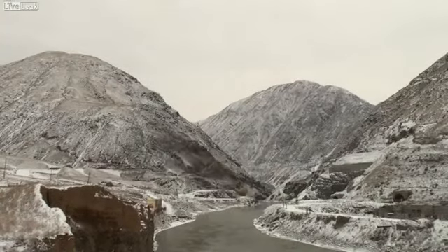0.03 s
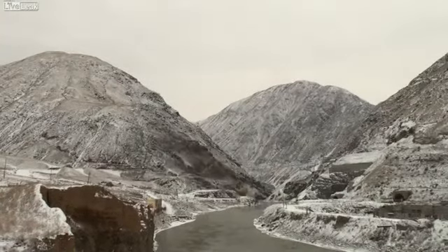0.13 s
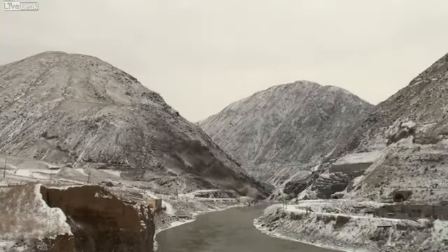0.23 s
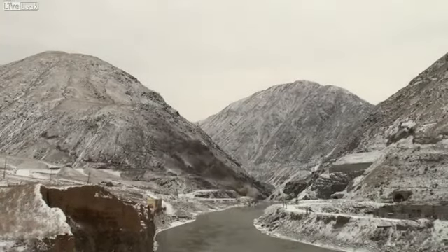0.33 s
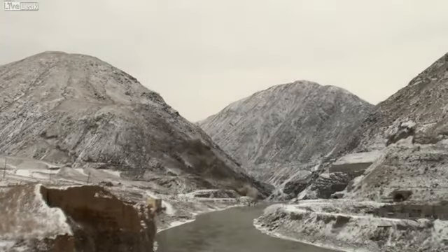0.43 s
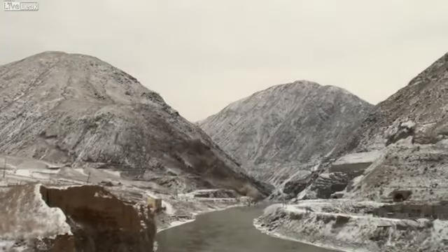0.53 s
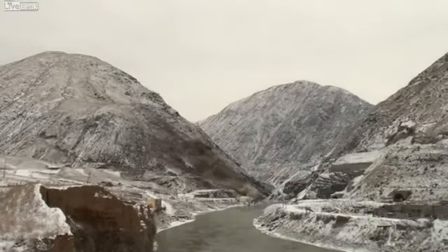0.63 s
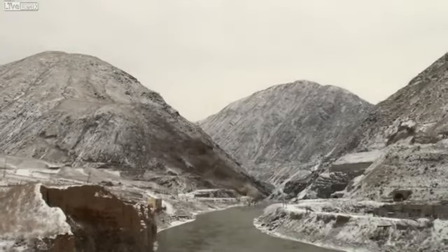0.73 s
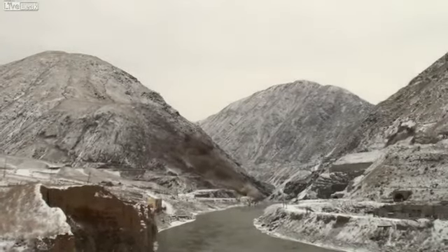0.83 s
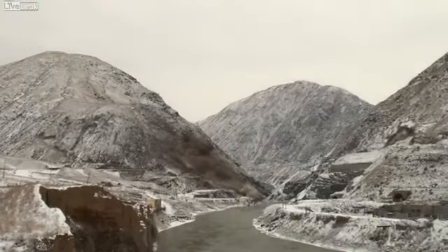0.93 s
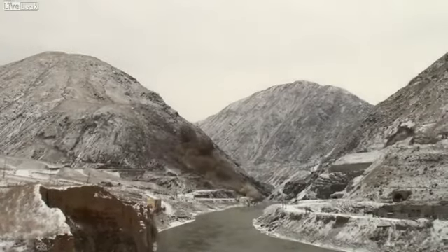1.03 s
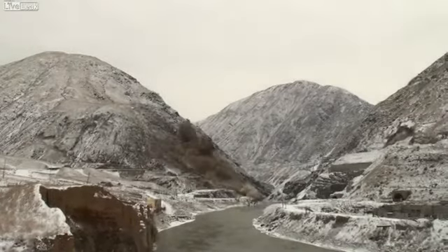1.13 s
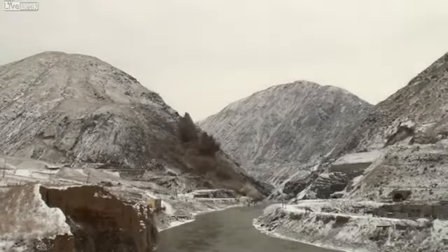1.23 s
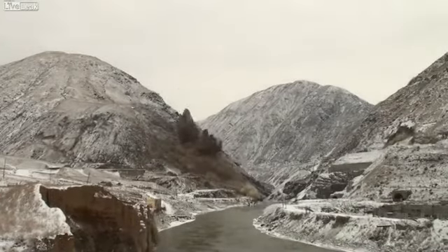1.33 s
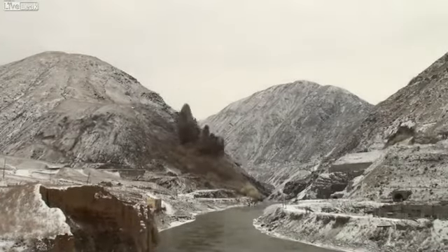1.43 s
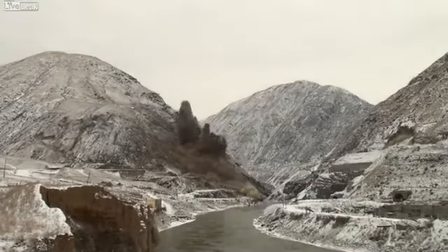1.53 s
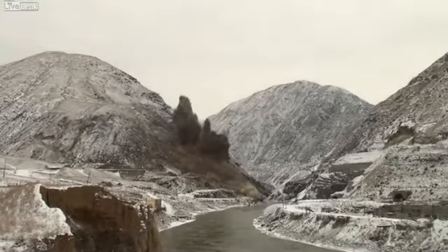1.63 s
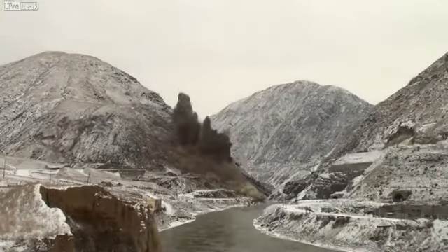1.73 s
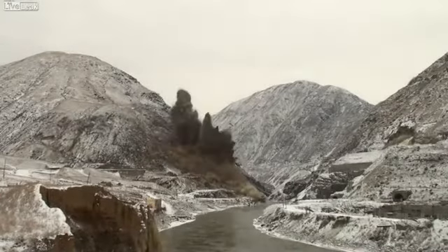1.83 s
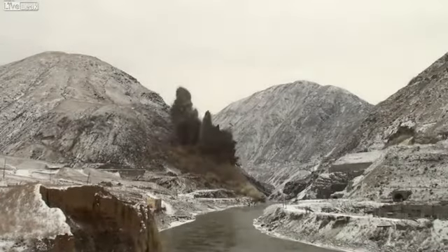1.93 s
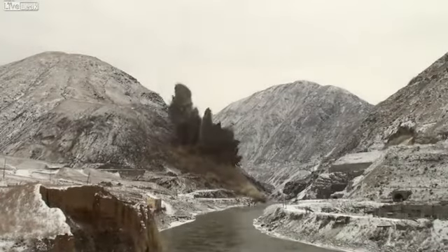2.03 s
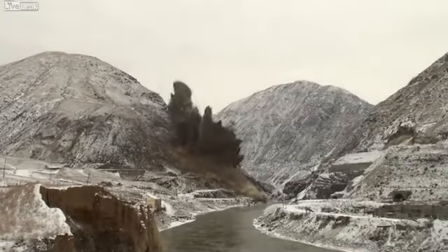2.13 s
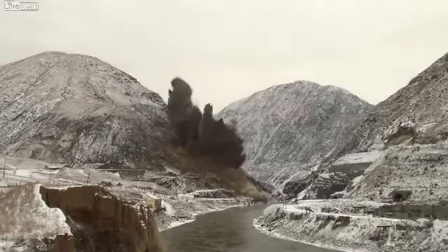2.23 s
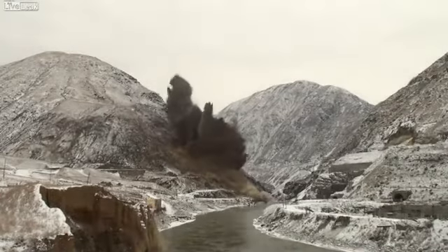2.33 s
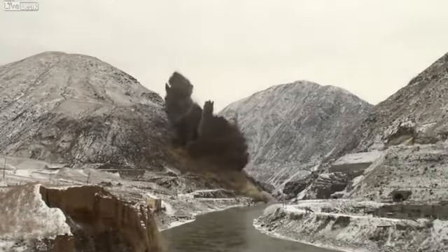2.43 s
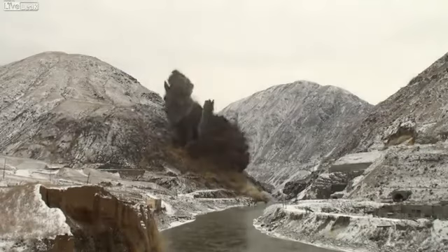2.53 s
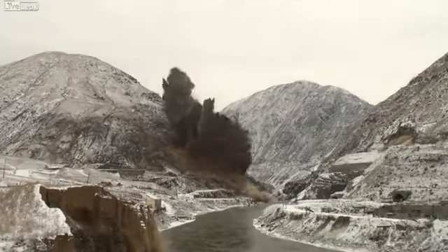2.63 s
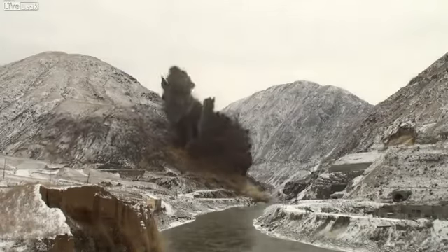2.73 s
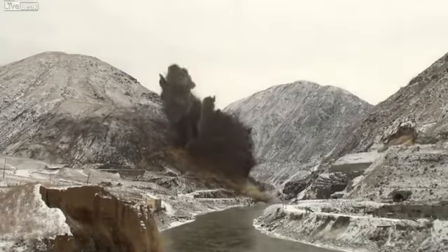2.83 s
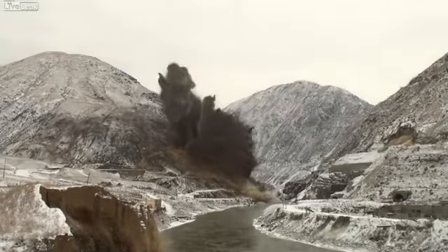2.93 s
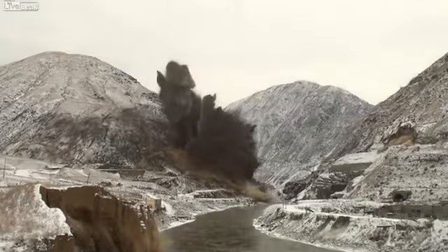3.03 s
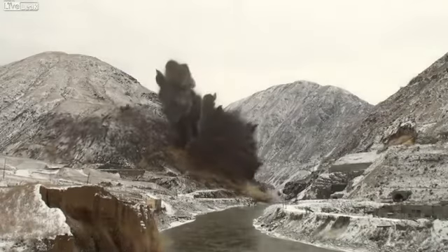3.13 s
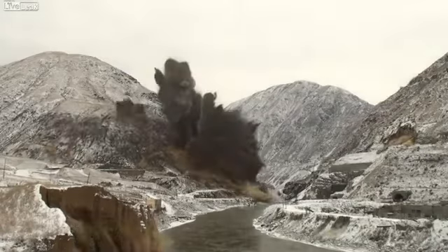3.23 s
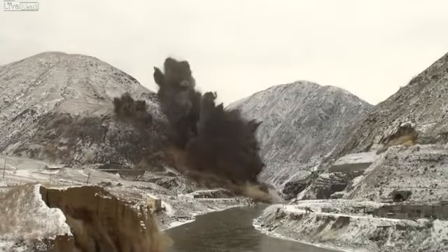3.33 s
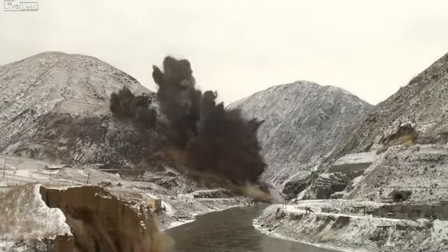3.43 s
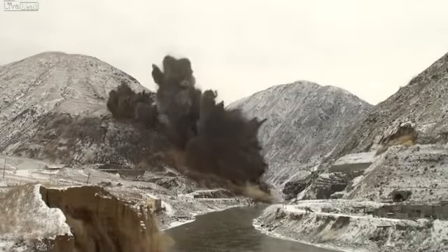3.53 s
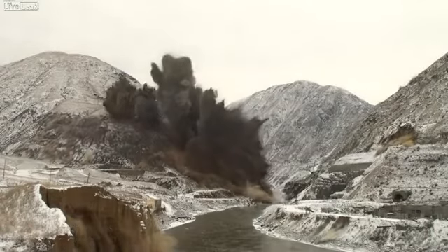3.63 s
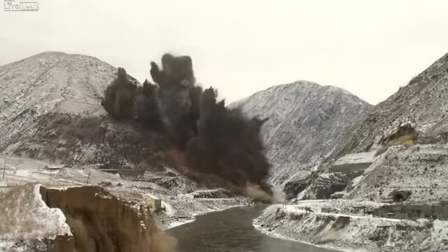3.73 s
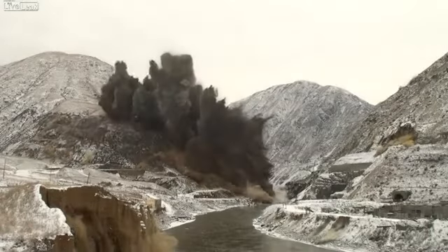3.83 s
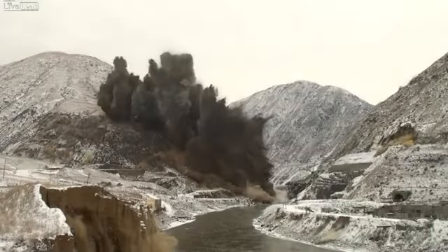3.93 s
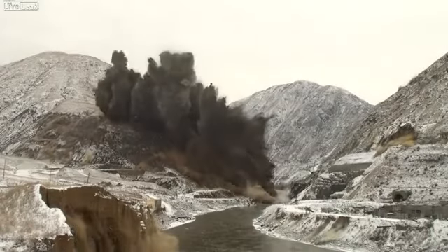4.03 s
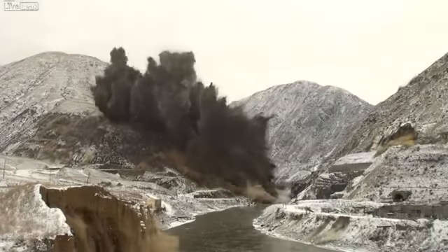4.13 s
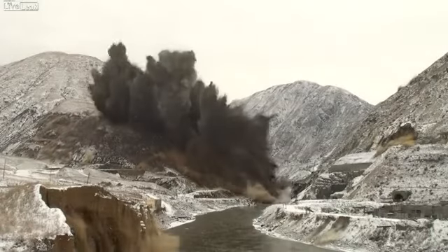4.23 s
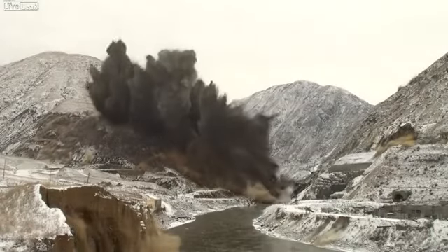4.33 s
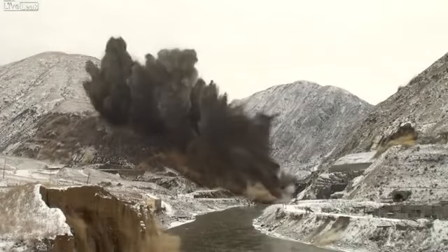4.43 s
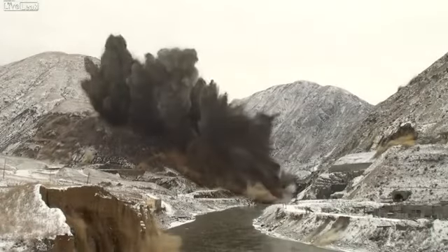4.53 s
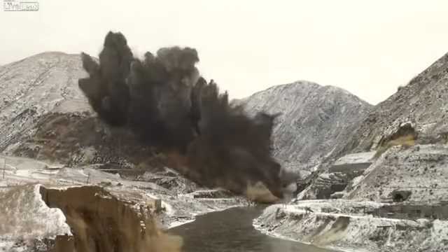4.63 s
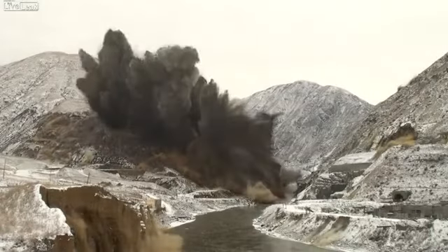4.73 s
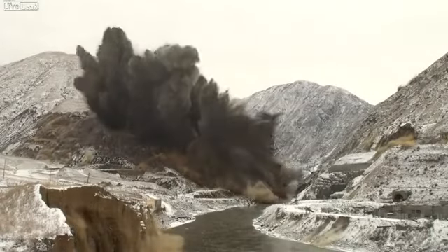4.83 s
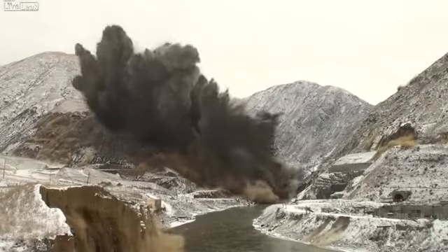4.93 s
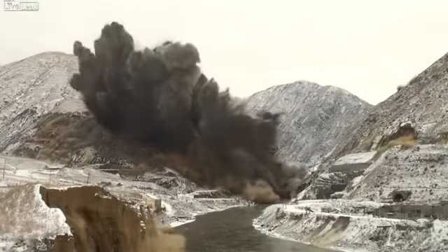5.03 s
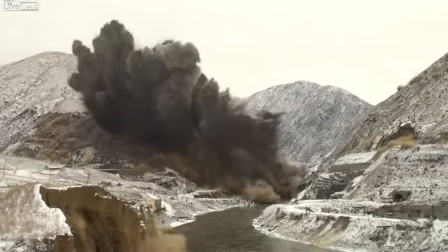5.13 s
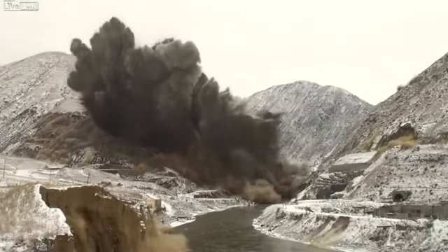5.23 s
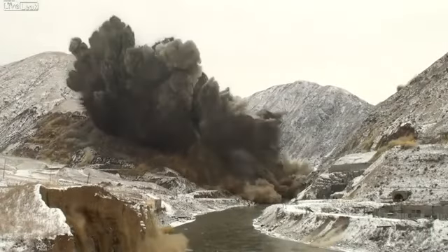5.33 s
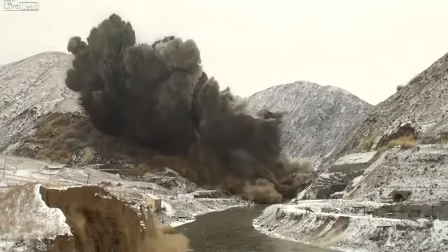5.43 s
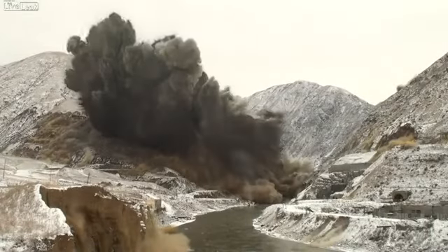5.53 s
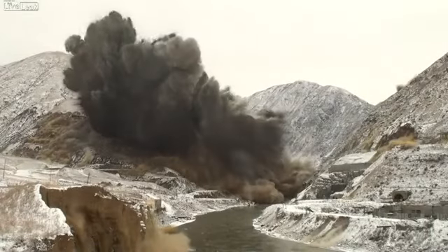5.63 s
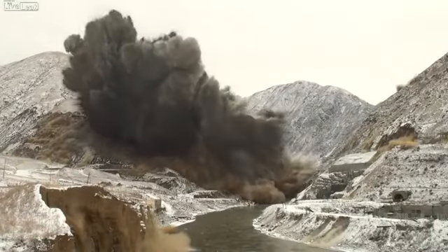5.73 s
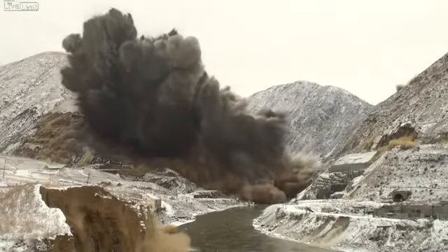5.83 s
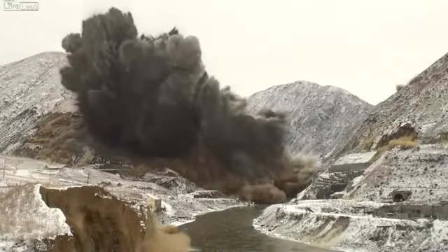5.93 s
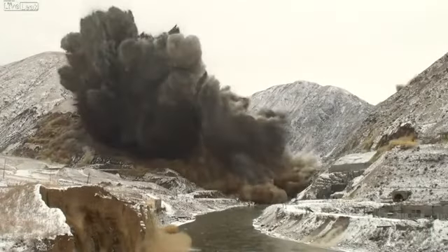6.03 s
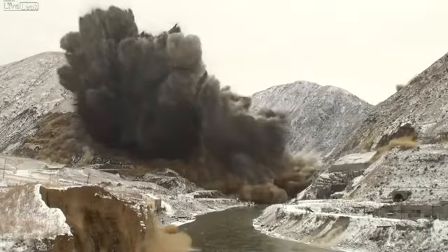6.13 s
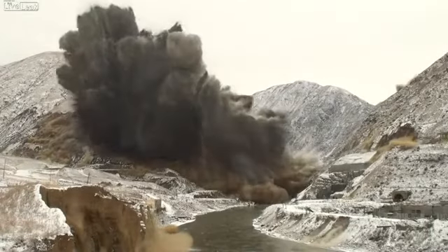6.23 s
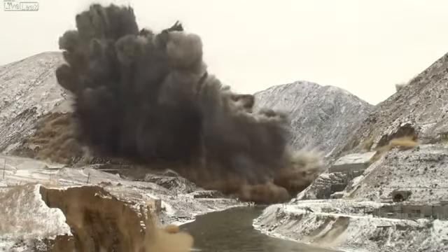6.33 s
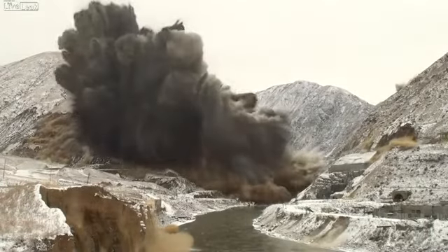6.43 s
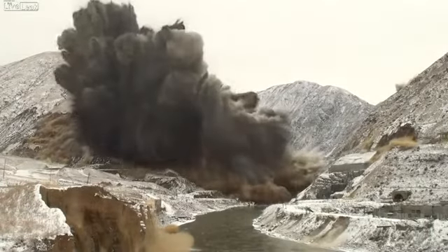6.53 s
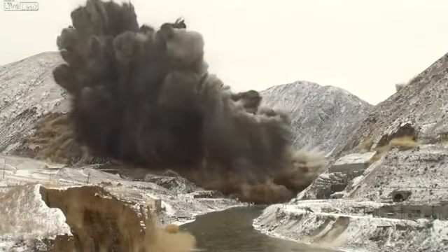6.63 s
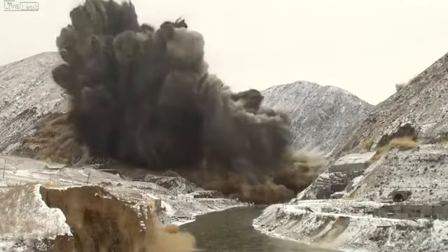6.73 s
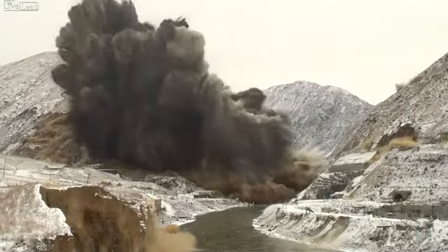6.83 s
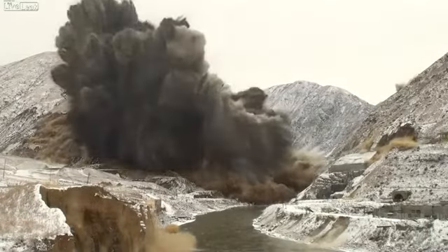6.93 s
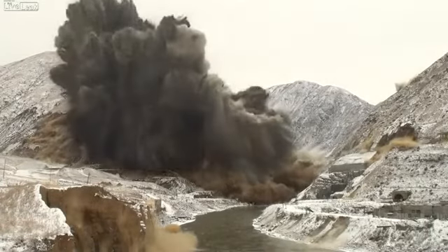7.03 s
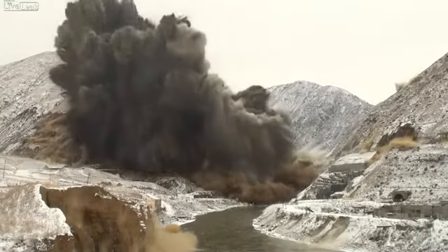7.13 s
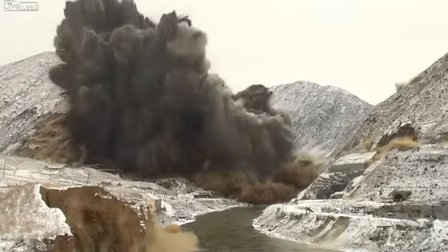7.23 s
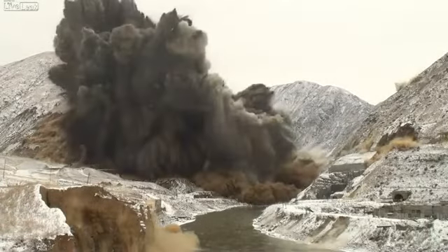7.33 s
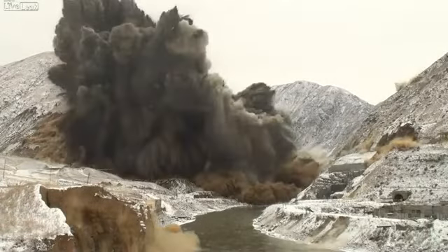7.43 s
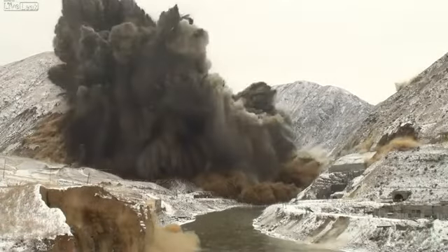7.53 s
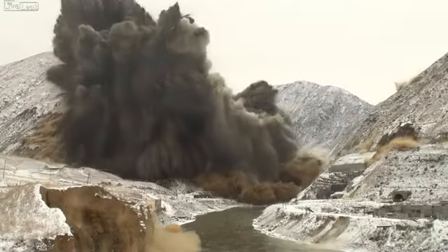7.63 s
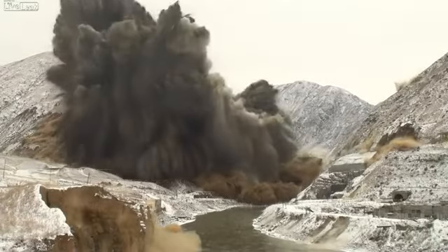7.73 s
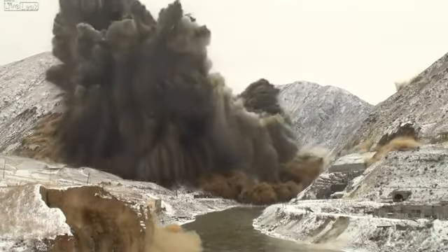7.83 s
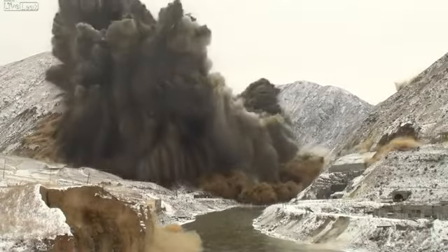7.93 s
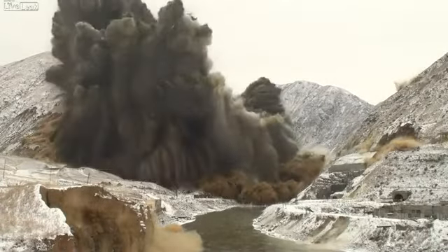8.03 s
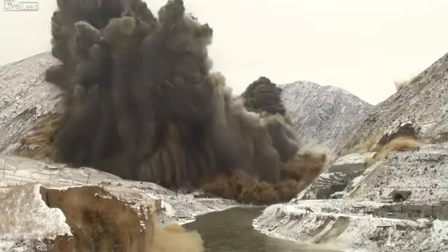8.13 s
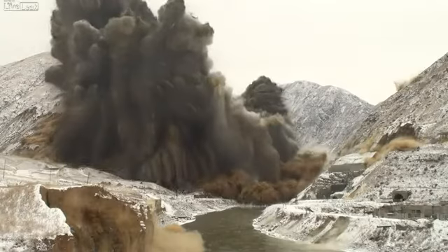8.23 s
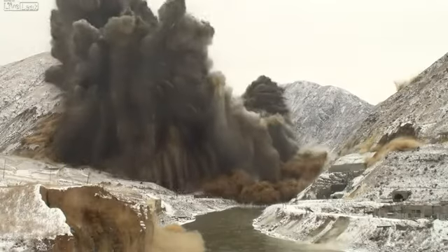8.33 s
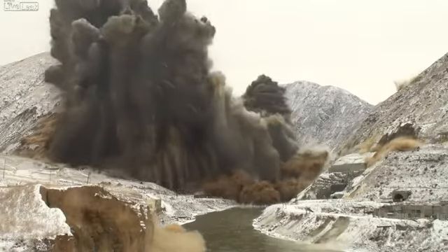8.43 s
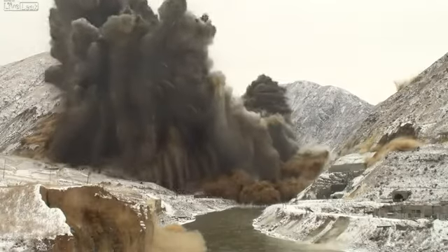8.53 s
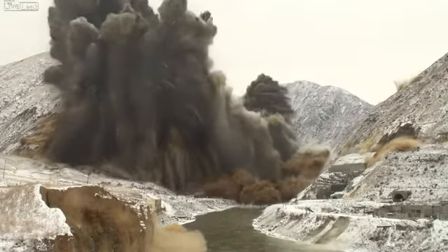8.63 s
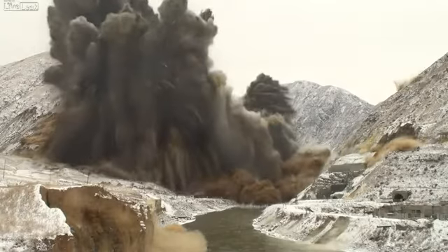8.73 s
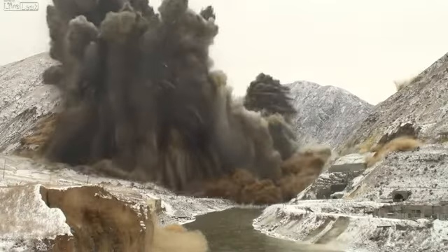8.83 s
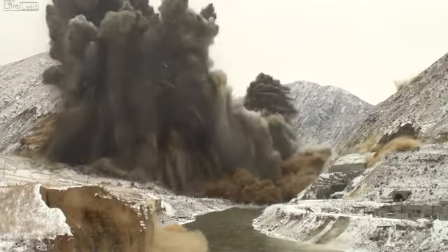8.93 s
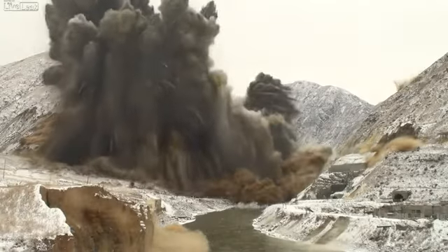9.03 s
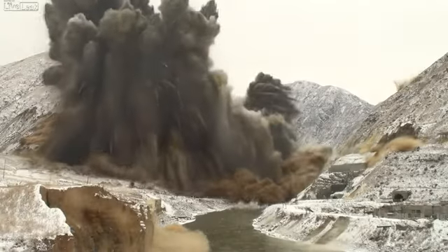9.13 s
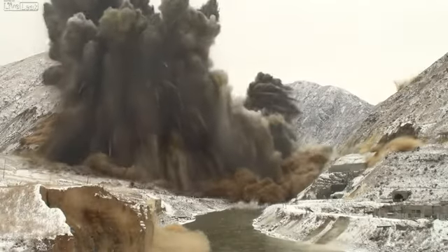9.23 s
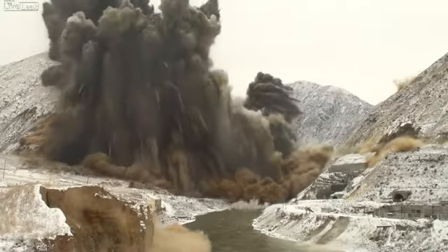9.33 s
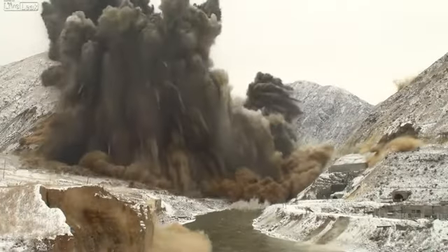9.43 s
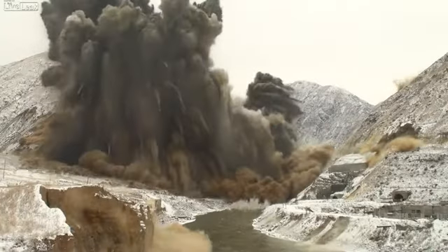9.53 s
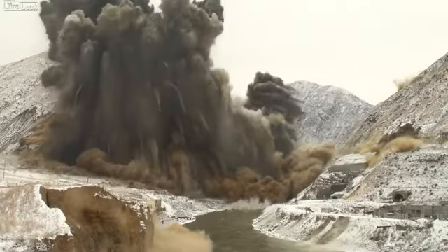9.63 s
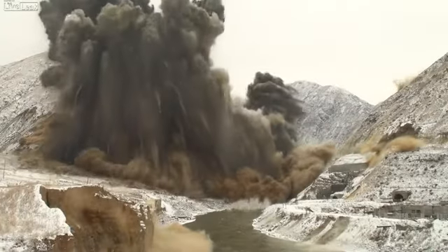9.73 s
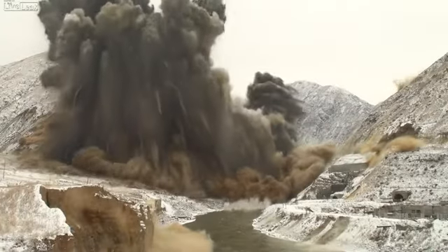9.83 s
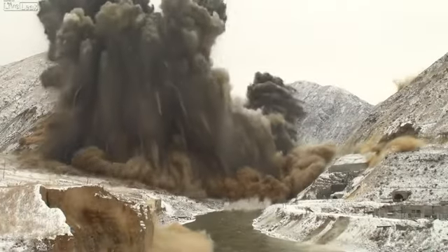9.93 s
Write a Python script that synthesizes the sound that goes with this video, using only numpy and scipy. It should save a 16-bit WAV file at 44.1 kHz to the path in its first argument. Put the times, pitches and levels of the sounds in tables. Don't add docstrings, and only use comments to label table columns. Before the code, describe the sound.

Distant mountainside blasts with gusty microphone thumps and housing knocks, followed by bright clattering stones and a growing, rolling roar of falling rock.

```python
import sys
import numpy as np
from scipy import signal
from scipy.fft import rfft, irfft, next_fast_len
from scipy.io import wavfile
from scipy.ndimage import uniform_filter1d

SR = 44100
rng = np.random.default_rng(int(sys.argv[2]) if len(sys.argv) > 2 else 0)


def magnitude_from_level(level_db):
    exponent = np.asarray(level_db, float) / 20
    return 10 ** exponent


def master_out(mix):
    frames = np.transpose(np.atleast_2d(mix))
    ceiling = np.clip(frames, -1, 1)
    pcm = np.round(ceiling * 32767).astype(np.int16)
    wavfile.write(sys.argv[1], SR, pcm)


N = 439236
TIME = np.arange(N) / SR
SLOW_TIME = TIME[::40]
SIZE = next_fast_len(N + SR)
HZ = np.arange(SIZE // 2 + 1) * SR / SIZE + 1e-3


def in_time(rows):
    s, *columns = np.transpose(rows)
    return [np.interp(TIME, s, column) for column in columns]


def at_hz(points):
    hz, value = np.transpose(points)
    return np.interp(np.log(HZ), np.log(hz + 1), value)


def rms_one(x):
    return x / np.sqrt(np.mean(x ** 2) + 1e-20)


def band_pass(x, order, low_hz, high_hz):
    return signal.sosfilt(signal.butter(order, [low_hz, high_hz], "band", fs=SR, output="sos"), x)


def low_pass(x, order, hz):
    return signal.sosfilt(signal.butter(order, hz, fs=SR, output="sos"), x)


def decay(t, t60):
    return magnitude_from_level(-60 * t / t60)


def ring(hz, t60):
    t = np.arange(int(0.15 * SR)) / SR
    return np.sin(2 * np.pi * hz * t) * decay(t, t60)


def add(out, s, pulse):
    at = round(s * SR)
    out[..., at:at + pulse.shape[-1]] += pulse[..., :N - at]


def drift(rate):
    r = np.exp(-80 * np.pi * rate / SR)
    noise = rng.standard_normal(N // 40 + 2002)
    slow = signal.lfilter([1], [1, -2 * r, r * r], noise)[2000:]
    return np.interp(np.arange(N) / 40, np.arange(len(slow)), rms_one(slow))


def impacts(per_s, spread_db, blur):
    excess_db = spread_db * np.minimum(rng.exponential(1, (2, N)), 4)
    sizes = magnitude_from_level(excess_db) * rng.choice([-1, 1], (2, N), p=[0.42, 0.58])
    kicks = sizes * (rng.random((2, N)) < per_s / SR)
    kicks = rms_one(kicks - kicks.mean())
    blur = np.clip(blur, 0, 1)
    return np.sqrt(1 - blur) * kicks + np.sqrt(blur) * rng.standard_normal((2, N))


# frequency in Hz, difference relative to the sum in dB,
# share tied to the sum from 0 to 1, phase shift in radians.
PORT_PAIR = [(60, -11, 0.58, -2.5), (130, -10, 0.5, -2), (260, -7.5, 0.7, -1.82), (500, -12, 0.72, -1.5),
             (1100, -12.5, 0.6, -1.15), (1500, -24, 0.3, -15), (1900, -14.5, 0.22, -0.5),
             (2250, -2, 0.1, 1.5), (2700, -11, 0.7, -1.0), (5000, -11.5, 0.38, -1.2),
             (6500, -5, 0.09, -2.5), (7500, -7.5, 0.16, -26.5), (9500, 7.5, 0.08, 15),
             (10500, 4.5, 0.05, 11), (12500, -3.5, 0.05, -3.5)]


def ports(pair):
    direct, diffuse = rfft(pair, SIZE)
    hz, side_db, tied, turn = np.transpose(PORT_PAIR)
    tied = np.clip(at_hz(np.c_[hz, tied]), 0, 1)
    shift = np.exp(1j * at_hz(np.c_[hz, np.unwrap(turn)]))
    mixed = np.sqrt(tied) * shift * direct + np.sqrt(1 - tied) * diffuse
    side = magnitude_from_level(at_hz(np.c_[hz, side_db])) * mixed
    return np.array([direct + side, direct - side])


def coloured(pair, colour, band_hz, tilt, patchy_db, flicker):
    spectrum = ports(pair) * magnitude_from_level(at_hz(colour))
    inside = (HZ > band_hz[0]) & (HZ < band_hz[1])
    spectrum /= np.std(irfft(spectrum.mean(axis=0) * inside, SIZE)[:N])
    out, together, pivot = 0, drift(flicker), np.sqrt(band_hz[0] * band_hz[1])
    for centre in 30 * 2. ** np.arange(10):
        share = np.clip(1 - np.abs(np.log2(HZ / centre)), 0, 1)
        gain_db = tilt * np.clip(np.log2(centre / pivot), -3, 1.6)
        gain_db = gain_db + patchy_db * (together + drift(flicker))
        out = out + magnitude_from_level(gain_db) * irfft(spectrum * share, SIZE)[:, :N]
    return out


# time in seconds, level in dB, tilt in dB per octave.
ROAR = [(0.0, -28.5, -3), (0.8, -24, -3.5), (1.2, -25, -2.5), (1.7, -25.5, -1.5), (2.5, -23, 0),
        (3.2, -24.5, -1.5), (3.7, -22.5, -0.5), (4.6, -19, 0), (5.68, -19, 2), (5.8, -17, 1),
        (6.1, -16.5, 0.5), (6.3, -17, 0.5), (6.55, -16, 0.9), (6.9, -15.5, 1), (7.05, -15.5, 0.5),
        (7.4, -16, 0.5), (9.0, -15.5, 1.7), (9.96, -15.5, 1.95)]
# frequency in Hz, density in dB per Hz.
ROAR_COLOUR = [(13, -50.5), (22, -18.5), (54, -6), (227, -5), (282, -1.5), (403, -2.5), (650, -7),
               (779, -9.5), (1550, -11), (2150, -26), (2680, -22.5), (3240, -27.5), (4270, -47),
               (6810, -70.5), (9990, -67.5), (14600, -77), (15500, -72.5)]


def roar(duck_db):
    level_db, tilt = in_time(ROAR)
    blows = impacts(per_s=2500, spread_db=1.0, blur=0.54)
    gain = magnitude_from_level(level_db + slabs() - 0.44 * duck_db)
    tilt = tilt - 0.085 * duck_db
    return gain * coloured(blows, ROAR_COLOUR, (300, 1500), tilt, patchy_db=0.89, flicker=19.0)


# time in seconds, lift in dB (negative
SLABS = [(0.498, 2), (0.6, 0), (0.74, -4), (1.04, 8), (2.68, 4), (3.36, 5), (5.73, -3), (5.8, 3),
         (6.378, 1.5), (6.413, -2), (9.18, 2.5), (9.7, 5)]


def slabs():
    rise_s, fall_s = 0.014, 0.026
    s, lift_db = np.transpose(SLABS)[:, :, None]
    after = SLOW_TIME - s
    shape = np.clip(np.minimum(1 + after / rise_s, 1 - after / fall_s), 0, 1)
    return np.interp(TIME, SLOW_TIME, np.sum(lift_db * shape, axis=0))


# middle in seconds, length in seconds, level in dB, pitch in Hz.
BOULDERS = [(0.494, 0.029, -24, 794), (0.537, 0.043, -22, 616), (0.739, 0.022, -22.5, 990),
            (0.92, 0.07, -27, 160), (0.982, 0.24, -18.5, 105), (1.15, 0.096, -24, 192),
            (2.825, 0.039, -18, 197), (2.9, 0.051, -24, 180), (3.03, 0.083, -24, 130),
            (3.097, 0.078, -31, 90), (7.079, 0.23, -27, 1100), (4.845, 0.091, -24, 252),
            (7.3, 0.098, -20, 146), (9.173, 0.056, -28, 248), (8.682, 0.11, -24, 60),
            (3.096, 0.19, -31, 573), (3.946, 0.32, -28, 550), (5.779, 0.16, -24.5, 312),
            (6.097, 0.14, -42, 556), (6.299, 0.19, -19.5, 556), (6.552, 0.17, -21, 605),
            (6.851, 0.26, -17.5, 572), (6.934, 0.13, -22, 282), (7.2, 0.04, -20, 138),
            (7.336, 0.085, -18.5, 350), (7.472, 0.058, -16, 248), (7.54, .15, -22, 595),
            (8.696, 0.43, -24, 315), (9.25, 0.14, -20.5, 184), (0.815, 0.047, -27, 302),
            (0.89, 0.022, -17, 272), (0.962, 0.027, -16, 252), (0.995, 0.022, -15, 340),
            (2.9, 0.089, -19, 197), (2.81, 0.03, -17, 300), (4.87, 0.084, -21.5, 380),
            (7.33, 0.081, -22, 149), (8.8, 0.13, -26, 274), (1.75, 0.25, -23, 138),
            (9.18, 0.024, -19.5, 520)]


def boulders():
    width = 1.13
    out = np.zeros(N)
    noises = rng.standard_normal((len(BOULDERS), SR // 2))
    for (middle, length, level_db, hz), noise in zip(BOULDERS, noises):
        t = np.arange(noise.size) / SR - 0.25
        swell = np.cos(np.pi * np.clip(t / (2 * length), -0.5, 0.5)) ** 2
        rumble = rms_one(band_pass(noise, 2, hz / width, hz * width))
        add(out, middle - 0.25, magnitude_from_level(level_db) * swell * rumble)
    return out * magnitude_from_level([[0.3], [-0.3]])


# time in seconds, level in dB, tilt in dB per octave.
SHOWER = [(0.0, -42, -4.5), (0.36, -33, 1.5), (0.55, -38.5, 1), (0.85, -31.5, 2.5), (1.14, -37, -0.5),
          (2.05, -32, -0.9), (2.45, -31.5, 0.5), (2.76, -26.5, -0.5), (3.13, -28, -2), (3.25, -27.5, -1.5),
          (3.45, -27.5, -1), (3.53, -31, -2.5), (3.83, -30.5, -2.5), (4.1, -28.5, -1), (4.63, -28, -0.5),
          (5.08, -30, -0.5), (5.85, -34, 0.5), (6.6, -40.5, -0.5), (7.5, -47.5, 3), (9.96, -56.5, 3)]
# frequency in Hz, density in dB per Hz.
SHOWER_COLOUR = [(410, -14.5), (700, -4.5), (757, -12), (1010, -1.5), (1690, -4.5), (1970, -3.5),
                 (2220, -18.5), (2590, -6.5), (3730, -4.5), (5360, -17.5), (5950, -22.5), (6250, -27),
                 (6590, -29), (7900, -28), (9300, -36.5), (10200, -51), (11200, -52.5), (14500, -55),
                 (15500, -66)]


def shower(duck_db):
    level_db, tilt = in_time(SHOWER)
    grains = impacts(per_s=3000, spread_db=3.0, blur=0.51)
    gain = magnitude_from_level(level_db - 1.36 - duck_db)
    tilt = tilt + 0.043 * duck_db
    return gain * coloured(grains, SHOWER_COLOUR, (3600, 6000), tilt, patchy_db=1.12, flicker=22)


def cracks(rows, side_db, t60, tone, width):
    out, noises = np.zeros((2, N)), rng.standard_normal((len(rows), int(0.07 * SR)))
    t = np.arange(noises.shape[1]) / SR
    for (s, peak_db, hz, snap_db), noise in zip(rows, noises):
        pan_db = side_db + 11 * noise[-1]
        puff = noise * decay(t, t60)
        stone = band_pass(tone * ring(hz, t60)[:noise.size] + 0.4 * puff, 3, hz / width, hz * width)
        stone += magnitude_from_level(snap_db + 3.5) * band_pass(puff, 2, 6800, 9300)
        sharp_front = np.diff(noise * decay(t, 0.0035), prepend=0)
        stone += magnitude_from_level(snap_db - 7) * sharp_front
        add(out, s, magnitude_from_level(peak_db + 2.5) * magnitude_from_level([[pan_db / 2], [-pan_db / 2]]) * stone)
    return out


# time in
# seconds, peak in dB, pitch in Hz, snap in dB.
STONES = [(0.0344, -15.5, 3180, -27), (0.1022, -9, 3250, -29), (0.165, -14, 3100, -33),
          (2.4367, -11, 3000, -26), (3.481, -10, 3240, -40), (4.097, -11, 3600, -35),
          (4.6137, -3, 3120, -42), (5.428, -19, 3760, -36), (5.6317, -13, 4360, -38),
          (6.004, -22, 3930, -24), (6.205, -29, 3190, -9), (6.3014, -26, 3360, -13),
          (6.378, -16, 3970, -24), (6.5238, -14.5, 3770, -37.5), (6.787, -9, 3100, -43),
          (5.731, -21, 4260, -32), (7.0189, -18, 3580, -36), (7.0905, -19, 3930, -36),
          (7.2826, -17, 3240, -36), (4.85, -16, 4300, -36), (7.3593, -16, 3360, -43),
          (7.4056, -16, 2960, -43), (7.4544, -29, 4030, -20), (7.5338, -26, 4460, -14),
          (7.583, -18, 3700, -43), (7.6081, -16, 3700, -40), (7.7025, -14.5, 3800, -43),
          (7.8195, -22.5, 3000, -31), (8.0277, -20.5, 3780, -29), (8.754, -30, 4000, -28),
          (3.237, -9, 3300, -40), (3.289, -17, 3400, -38), (3.3494, -6, 3100, -40),
           (3.3757, -5, 3160, -38), (3.3966, -12, 3150, -38), (3.5675, -14, 3300, -40),
           (3.665, -5.5, 3400, -38), (3.759, -6.5, 3020, -38), (3.9723, -7.5, 3160, -35),
           (4.0192, -6.5, 3100, -38), (4.2662, -12, 3460, -41), (4.4004, -15, 3400, -38),
           (4.4703, -10, 3480, -38), (4.555, -5, 2990, -34), (4.91, -13, 3850, -43),
           (4.9294, -12, 3700, -42), (5.322, -13, 3080, -38), (5.397, -12, 2780, -42),
           (5.502, -10, 3290, -40),
          (5.9095, -33, 5230, -18), (6.0467, -25, 4450, -28), (6.3344, -28, 4570, -24),
         (6.4194, -35, 4490, -16), (6.4384, -44, 4500, -20), (6.714, -30, 4650, -18),
         (6.779, -31, 4900, -16), (6.815, -35, 4530, -20), (6.8494, -36, 4760, -23),
         (6.9202, -34.5, 4680, -18), (6.9554, -31, 4410, -17), (7.0559, -36, 5500, -17),
         (7.2444, -43, 4500, -18), (6.541, -18, 3300, -40), (7.3512, -37, 4760, -15),
         (7.3964, -44, 4430, -14), (7.3404, -33, 4800, -24), (7.7194, -46, 4400, -16),
         (7.8037, -38.5, 4630, -14.5), (7.8371, -45, 4590, -16.5), (7.865, -32, 4570, -15),
         (7.9254, -40, 4610, -19.5), (8.026, -34, 4300, -20), (8.0666, -41, 4430, -18),
         (8.1863, -43, 4480, -20), (8.756, -35, 5170, -19), (8.9014, -47, 4400, -15.5),
         (8.9241, -46, 4420, -22), (9.1174, -40, 4740, -21.5), (9.2464, -40, 4400, -14)]


def stones():
    rows = STONES
    near = magnitude_from_level(3) * cracks(rows, side_db=0, t60=0.011, tone=0.35, width=1.377)
    return low_pass(near, 6, 9500)


# time in seconds, peak in dB, pitch in Hz.
PINGS = [
    (2.762, -5.5, 3880),
]


def pings():
    rise_s = 0.004
    out = np.zeros(N)
    for s, peak_db, hz in PINGS:
        tone = ring(hz, t60=0.031)
        onset = np.minimum(np.arange(tone.size) / SR / rise_s, 1)
        add(out, s, magnitude_from_level(peak_db) * tone * onset)
    return out


# start in seconds, hold in seconds, level in dB, eddy pitch in Hz.
GUSTS = [(0.306, .01, -13, 45), (0.44, 0.029, -14, 34.2), (0.527, .15, -16, 22), (0.686, 0.086, -15, 24.8),
         (0.81, 0.049, -9, 104), (0.9, 0.07, -5, 97), (1.01, 0.11, -10, 85.5), (1.135, 0.072, -11.5, 90),
         (1.24, 0.26, -13.5, 93), (1.666, 0.013, -13.5, 69.6), (1.767, 0.16, -15, 75),
         (2.21, 0.17, -20, 90), (2.582, 0.045, -18.5, 90), (2.792, 0.042, -9, 115), (2.868, 0.06, -7, 56.3),
         (3.002, 0.071, -10, 80.5), (3.082, 0.045, -13, 60), (3.128, 0.045, -14, 70),
         (3.32, 0.022, -17, 45), (3.552, 0.28, -26, 49.6), (3.946, 0.032, -14, 40),
         (4.103, 0.17, -22, 81.4), (5.25, 0.017, -15, 49.7), (5.77, 0.016, -13, 109),
         (5.995, 0.68, -24.5, 45), (7.026, .02, -16, 170), (7.335, 0.049, -16, 100),
         (7.413, 0.061, -26, 168), (8.215, 0.087, -22, 121), (8.53, 0.032, -30, 170),
         (9.14, 0.069, -15, 153), (9.2, 0.16, -20, 70), (9.73, 0.11, -19, 148)]


def gust_levels():
    rise_db_s, fall_db_s, loss_db_oct = 299, 273.5, 8.5
    start, hold, level_db, hz = np.transpose(GUSTS)[:, :, None]
    shape_db = level_db - rise_db_s * np.maximum(start - SLOW_TIME, 0)
    shape_db = shape_db - fall_db_s * np.maximum(SLOW_TIME - start - hold, 0)
    swell_db = in_time(ROAR)[0] + 21
    levels = []
    # eddy Hz, calm level dB, dB per dB of roar
    for eddy_hz, calm_db, follows in [(26, -39, -0.66), (63, -31, -0.54), (155, -24.5, 1)]:
        away_db = loss_db_oct * np.abs(np.log2(hz / eddy_hz))
        power = np.sum(magnitude_from_level(shape_db - away_db) ** 2, axis=0)
        power = np.interp(TIME, SLOW_TIME, power) + magnitude_from_level(calm_db + follows * swell_db) ** 2
        levels.append(10 * np.log10(power))
    return levels


def eddies(low_hz, high_hz, even):
    swings = irfft(ports(rng.standard_normal((2, N))), SIZE)[:, :N]
    swings = rms_one(band_pass(swings, 3, low_hz, high_hz))
    height = uniform_filter1d(swings.mean(axis=0) ** 2, int(1.5 * SR / low_hz)) + 0.03
    return rms_one(swings / height ** (even / 2))


def wind(thump_db, buffet_db, flutter_db):
    gusts = magnitude_from_level(thump_db) * eddies(26.0, 47.4, even=0.74)
    gusts += magnitude_from_level(buffet_db - 2.5) * eddies(37.0, 102.5, even=0.85)
    gusts += magnitude_from_level(flutter_db - 2.0) * eddies(116.0, 245.0, even=0.38)
    return 0.71 * np.tanh(gusts / 0.56)


def duck(buffet_db, flutter_db):
    knee_db, slope, smooth_s = -17.5, 0.81, 0.082
    load_db = 10 * np.log10(magnitude_from_level(buffet_db - 4) ** 2 + magnitude_from_level(flutter_db) ** 2)
    return uniform_filter1d(slope * np.maximum(load_db - knee_db, 0), size=int(smooth_s * SR))


# start in seconds, hold in seconds, loss in dB.
GRABS = [
    (0.9, 0.095, 3.5),
    (1.012, 0.01, 5),
    (1.067, 0.043, 0),
    (2.808, 0.032, 6.5),
    (2.851, 0.13, 5.5),
    (3.001, 0.12, 3),
    (6.403, 0.026, 2.5),
]


def grabs():
    edge_s = 0.0067
    start, hold, loss_db = np.transpose(GRABS)[:, :, None]
    inside = np.minimum(SLOW_TIME - start, start + hold - SLOW_TIME)
    shape = np.clip(1 + inside / edge_s, 0, 1)
    return np.interp(TIME, SLOW_TIME, np.sum(loss_db * shape, axis=0))


# time in seconds, peak in dB, pitch in Hz, snap in
# dB.
GRIT = [(0.4544, -26, 3370, -10), (0.464, -14, 3400, -25), (0.485, -7, 2670, -30), (0.492, -27, 4300, -25),
        (0.4885, -21.5, 5000, -20), (0.496, -26, 3600, -27), (0.507, -19, 4730, -27),
        (0.569, -5.5, 3400, -35), (0.573, -21, 5100, -22), (0.5028, -5.5, 3180, -30.5),
        (0.5212, -20, 3240, -14), (0.5322, -8, 3320, -24), (0.554, -28, 3050, -17),
        (0.5643, -19, 4480, -33), (0.591, -22, 2970, -12.5), (0.6282, -14.5, 5630, -30),
        (0.7033, -31, 3240, -22), (0.7344, -33, 4000, -1), (0.7414, -26, 3020, -16),
        (0.692, -14, 2700, -25), (0.731, -3, 1800, -29), (0.887, -17, 1500, -33),
        (0.7774, -14, 2980, -18.5), (0.9971, -24, 3260, -18.5), (1.0253, -27, 5140, -27),
        (1.042, -13, 3200, -39.5), (2.6564, -23, 3150, -24), (2.9866, -15, 3450, -38.5)]


def grit():
    return cracks(GRIT, side_db=-9.5, t60=0.027, tone=0.2, width=1.58)


# time in seconds, peak in dB, pitch in Hz.
KNOCKS = [(0.468, -21, 465), (0.478, -9, 583), (0.485, -12, 377), (0.499, -13, 690), (0.513, -9, 605),
          (0.537, -18, 570), (0.529, -16, 393), (0.59, -6.5, 804), (0.603, -7, 453), (0.673, -17, 536),
          (0.697, -13, 653), (0.7318, -10.5, 965), (0.737, -5, 440), (0.741, -12, 760), (0.792, -8.5, 447),
          (0.831, -14, 372), (0.998, -11, 354), (1.023, -22, 390), (1.108, -17, 378), (2.8, -4, 318),
          (5.729, -8.5, 402), (6.426, -12, 674), (7.101, -7.5, 465), (9.168, -9, 530), (9.182, -4.5, 470)]


def knocks():
    out, t60 = np.zeros(N), 0.038
    for s, peak_db, hz in KNOCKS:
        body = ring(hz, t60) + 0.31 * ring(1.37 * hz, t60) + 0.071 * ring(0.58 * hz, 0.55 * t60)
        add(out, s, magnitude_from_level(peak_db + 1.0) * body)
    return low_pass(out, 2, 2500) * magnitude_from_level([[1.5], [-1.5]])


# time in seconds, level in dB.
RATTLE = [
    (0.42, -60),
    (0.448, -46),
    (0.596, -45),
    (0.722, -56.5),
    (0.742, -37.5),
    (0.75, -53),
    (0.83, -56),
]
# frequency in Hz, density in dB per Hz.
RATTLE_COLOUR = [(530, -40), (900, 3), (1120, -3), (1300, -25.5), (1420, -19), (1540, -6.5), (1800, 0),
                 (5000, -20), (6500, -28.5), (7700, -16), (9200, -27.5), (15500, -41)]


def rattle():
    level_db, = in_time([(0.4, -90), *RATTLE, (0.86, -90)])
    ticks = impacts(per_s=1700, spread_db=10.0, blur=0.58)
    ticks = rfft(ticks[0] + 0.69 * ticks[1] * [[1], [-1]], SIZE) * magnitude_from_level(at_hz(RATTLE_COLOUR))
    inside = (HZ > 7000) & (HZ < 12000)
    ticks /= np.std(irfft(ticks.mean(axis=0) * inside, SIZE)[:N])
    return magnitude_from_level(level_db) * irfft(ticks, SIZE)[:, :N]


# frequency in Hz, density in dB per Hz.
HISS_COLOUR = [(8000, -19.5), (10300, -3.5), (11500, -0.5), (13500, -2.5), (14600, -3), (15400, -11)]


def hiss():
    shared, own = rng.standard_normal((2, N))
    noise = rfft(shared + 0.7 * own * [[1], [-1]], SIZE)
    noise = noise * magnitude_from_level(at_hz([(4000, -60), *HISS_COLOUR]))
    return magnitude_from_level(-67) * rms_one(irfft(noise, SIZE)[:, :N])


def scene():
    thump_db, buffet_db, flutter_db = gust_levels()
    duck_db = duck(buffet_db, flutter_db) + grabs()
    slope = roar(duck_db) + boulders() + shower(duck_db) + stones() + pings()
    air = wind(thump_db, buffet_db, flutter_db)
    housing = grit() + knocks() + rattle()
    return slope + air + housing + hiss()


def gated(x):
    lead = 491
    sum_and_side = np.pad([x[0] + x[1], x[0] - x[1]], [(0, 0), (lead, 0)])
    hz, _, lines = signal.stft(sum_and_side, SR, "hann", 2048)
    power = uniform_filter1d(np.abs(lines) ** 2, size=3, axis=1)
    top = power[:, (hz > 12200) & (hz < 14400)].mean(axis=1)
    top_db = uniform_filter1d(10 * np.log10(top + 1e-20), size=5)
    loud = power[0, (hz > 3000) & (hz < 5000)].mean(axis=0)
    loud_db = uniform_filter1d(10 * np.log10(loud + 1e-20), size=9)
    top_db = np.maximum(top_db, loud_db - 47.5)
    margin_db = np.array([[2.0], [1.2]])
    keep = power > magnitude_from_level(top_db + margin_db)[:, None] ** 2
    keep = keep | (hz < 6000)[:, None]
    total, side = signal.istft(lines * keep, SR, "hann", 2048)[1][:, lead:N + lead]
    return np.array([total + side, total - side]) / 2


def roll_off(x):
    return signal.sosfilt(signal.butter(12, 15690, fs=SR, output="sos"), x)


def record(dry):
    ceiling, knee = 1.05, 3.0
    held = 0.9 * dry / (1 + np.abs(dry / ceiling) ** knee) ** (1 / knee)
    return roll_off(gated(held))


dry = scene()
out = record(dry)
master_out(out)
```